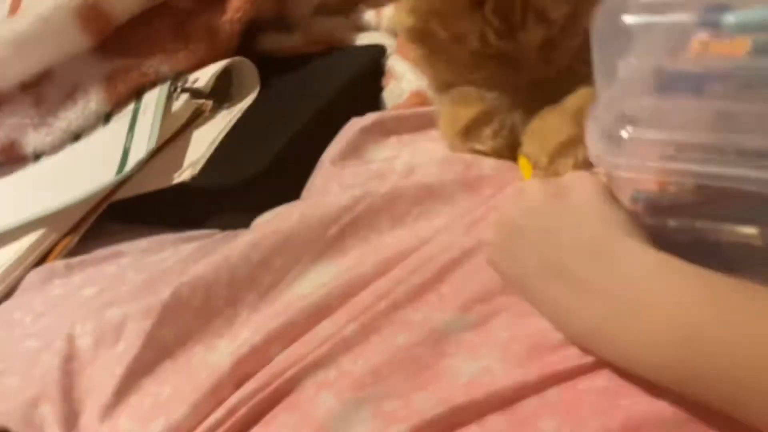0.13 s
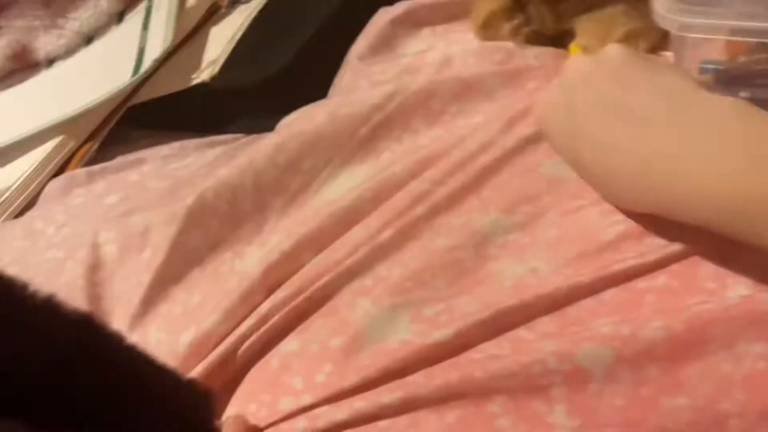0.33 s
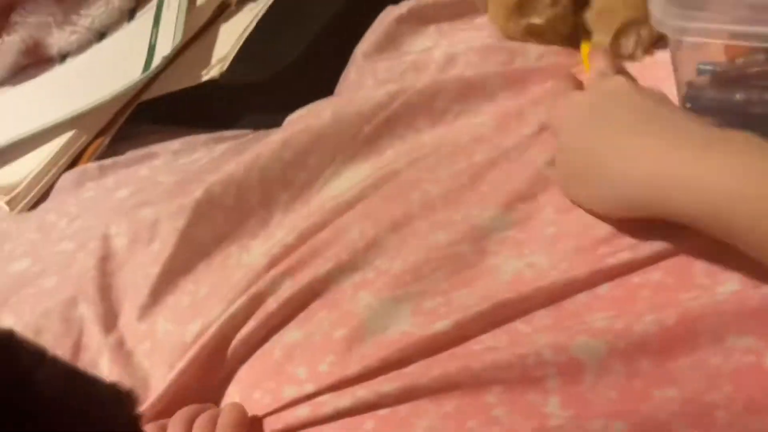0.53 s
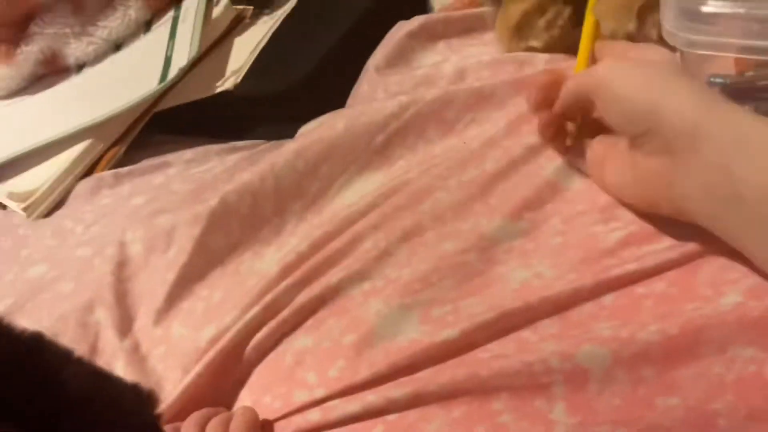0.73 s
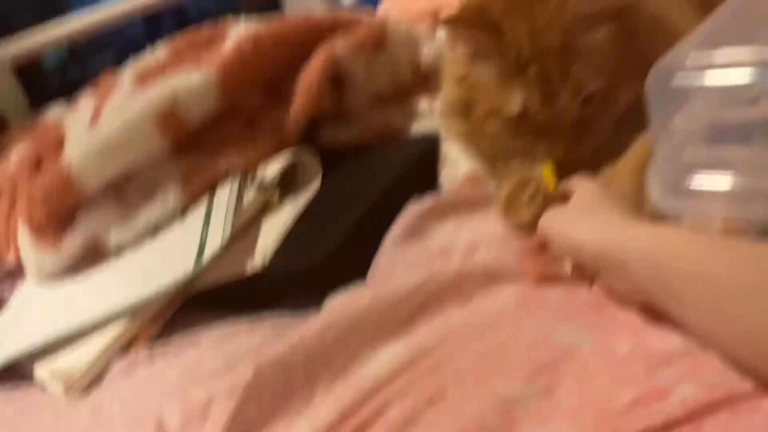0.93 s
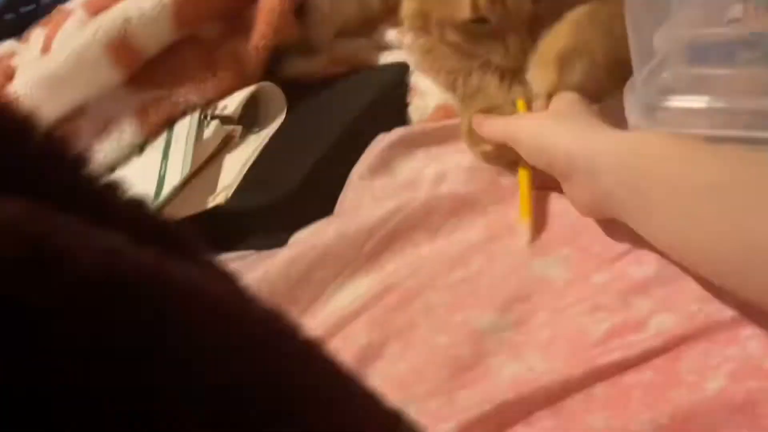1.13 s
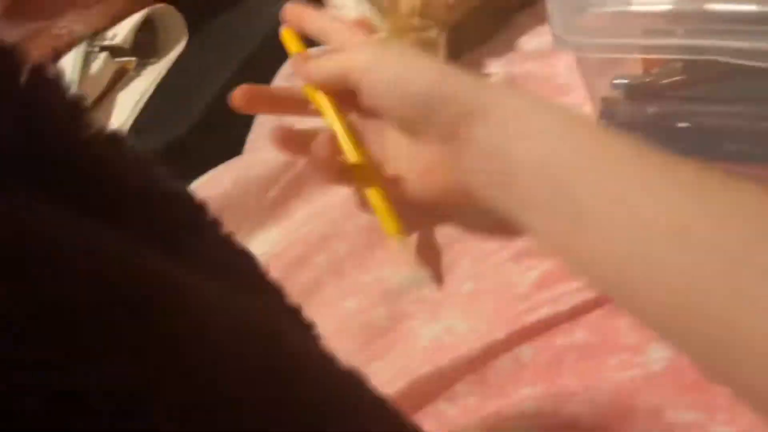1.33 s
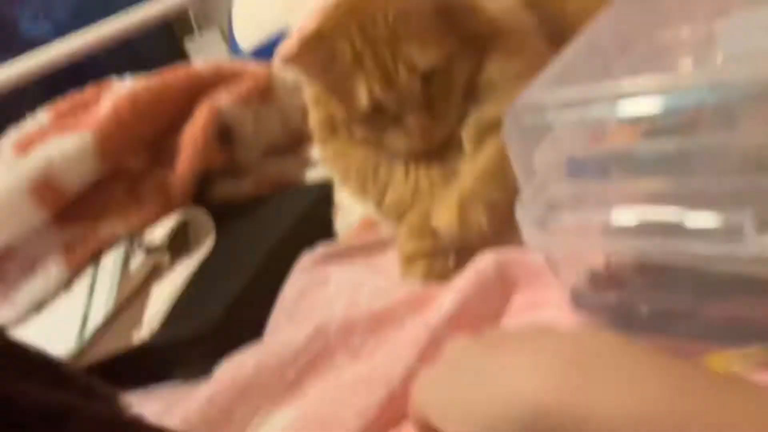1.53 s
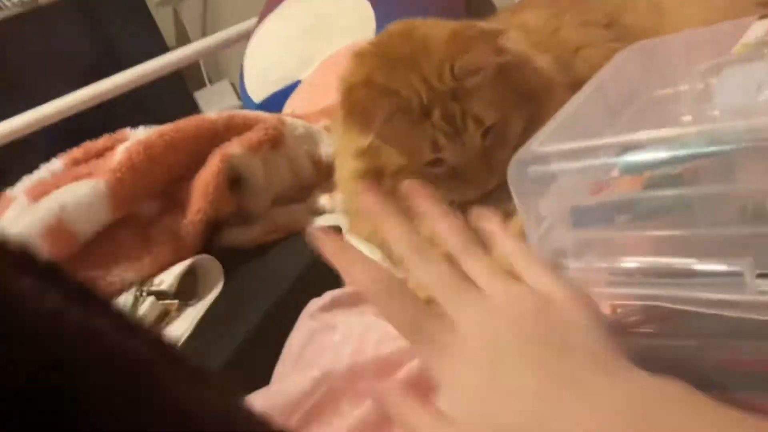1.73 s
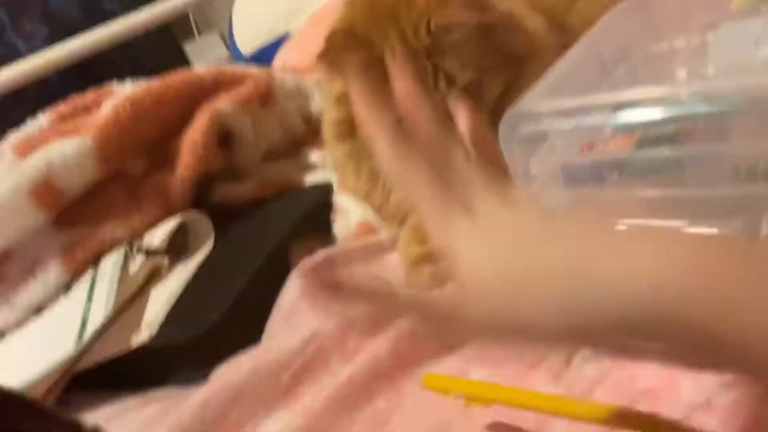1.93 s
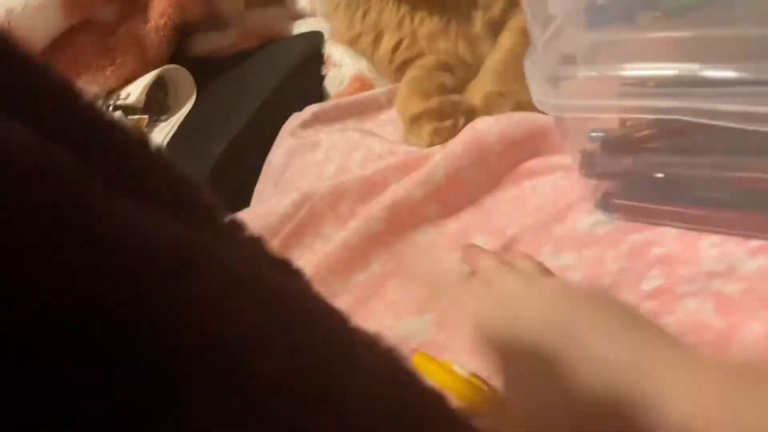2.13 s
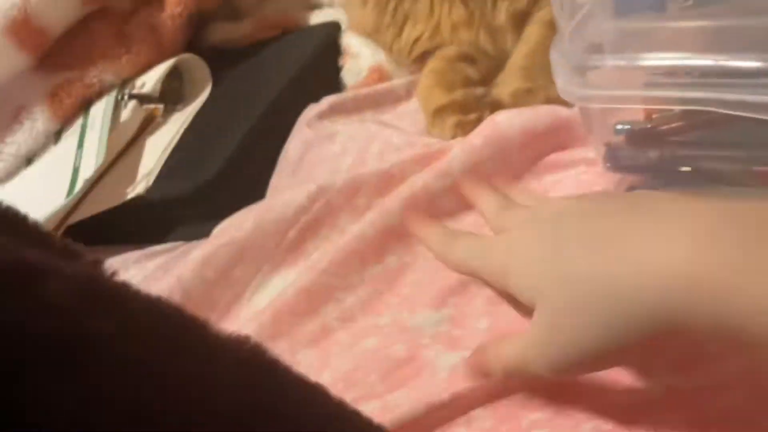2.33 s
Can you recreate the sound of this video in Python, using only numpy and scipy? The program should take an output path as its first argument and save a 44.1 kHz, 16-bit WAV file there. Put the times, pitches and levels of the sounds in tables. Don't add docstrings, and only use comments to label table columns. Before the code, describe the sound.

Two quick cat chirps, the first arching and falling, the second rising then dropping loudly, among hollow pats, dry ticks, cloth strokes and faint sniffs; close microphone, soft dry room, faint low hum.

```python
import sys
import numpy as np
from scipy import signal
from scipy.io import wavfile
from scipy.ndimage import uniform_filter1d

SR = 44100
rng = np.random.default_rng(int(sys.argv[2]) if len(sys.argv) > 2 else 0)


def put_to_file(sound):
    columns = np.atleast_2d(sound).T
    safe = np.clip(columns, -1, 1)
    whole_steps = np.round(safe * 32767)
    wavfile.write(sys.argv[1], SR, whole_steps.astype(np.int16))


def volts(x):
    e = np.asarray(x, float) / 20
    return 10 ** e


N = 109941

# time_s, pitch_hz, level_db
WHISTLES = [
    [(.566, 1400, -62), (.577, 1520, -47), (.586, 1740, -37), (.593, 1700, -30), (.601, 1625, -26.5),
     (.608, 1520, -30), (.6105, 1470, -38), (.614, 1390, -31), (.622, 1230, -39)],
    [(.619, 1300, -50), (.6245, 1330, -37), (.629, 1060, -50), (.636, 1030, -42), (.646, 1000, -46),
     (.668, 960, -64)],
    [(1.678, 1060, -56), (1.682, 1080, -46), (1.685, 1020, -36), (1.693, 1090, -28.5), (1.7015, 1170, -35),
     (1.7038, 1250, -31.5), (1.707, 1240, -47), (1.717, 1320, -50), (1.73, 1300, -62)],
    [(1.745, 1480, -48), (1.7535, 1495, -23.5), (1.760, 1485, -22), (1.7645, 1465, -24),
     (1.7695, 1410, -22), (1.7728, 1350, -33), (1.777, 1290, -23.5), (1.7805, 1230, -41),
     (1.805, 1190, -58)],
]
# multiple, level_db under the fundamental, before each note's own voice
OVERTONES = [(2, -16), (3, -37), (4, -33), (5, -36), (6, -39), (7, -30)]
# second_partial_db, higher_partials_db, loss_db per dB below the peak, loss_db per % of pitch sag
NOTE_VOICES = [(-8, 0, -.3, .3), (-10, -6, 0, 0), (-22, -5, -.2, 1), (2, -5, .7, 1.0)]


def chirps():
    out = 0
    flutter_db, jitter = 0.5 * drift(130), 0.006 * drift(240)
    rasp = [volts(6 * drift(100)) for _ in OVERTONES[1:]]
    for rows, (second_db, higher_db, loss, sag) in zip(WHISTLES, NOTE_VOICES):
        gate, hz, db = curve(rows)
        smooth_hz = uniform_filter1d(hz, size=150)
        phase = 2 * np.pi * np.cumsum(smooth_hz * (1 + jitter)) / SR
        db = uniform_filter1d(db, size=140)
        octave = volts(OVERTONES[0][1] + second_db) * np.cos(2 * phase)
        higher = sum(r * volts(d) * np.cos(k * phase) for r, (k, d) in zip(rasp, OVERTONES[1:]))
        upper = octave + volts(higher_db) * higher
        sag_percent = 100 * (hz / hz[db.argmax()] - 1)
        upper_db = loss * (db - db.max()) + np.minimum(sag * sag_percent, 9)
        level = np.sqrt(2) * volts(db + flutter_db)
        out = out + gate * level * (np.cos(phase) + upper * volts(upper_db))
    return out


# time_s, level_db, share of the second colour (0-1)
HISSES = [
    [(.543, -80.5, 0), (.562, -40.5, .01), (.578, -39, 0), (.606, -39.5, 0), (.636, -39, 0.9),
     (.678, -32, 1), (.700, -38.5, 0.97), (.735, -78, 0.7)],
    [(1.699, -56, 0.3), (1.712, -41.5, 0), (1.720, -41.5, 0.16), (1.728, -40, 0.02), (1.740, -41.5, 0.02),
     (1.748, -58, 0.3), (1.764, -57.5, 0.4), (1.795, -75, 0.6)],
]
# centre_hz, width_hz, level_db
NARROW_MOUTH = [(3200, 1000, -15), (6500, 450, -1), (8900, 1000, 1), (11800, 1600, -7), (14800, 1000, 2)]
OPEN_MOUTH = [(5000, 1000, -16), (6500, 600, -9), (8300, 800, 0), (10900, 2000, 0), (13800, 2400, -2)]
SECOND_CALL_MOUTH = [(3000, 900, -10), (4200, 450, -2), (6300, 700, -8), (8400, 900, -8), (10500, 600, 1),
                     (11700, 900, -3), (14200, 1800, 0)]
NOSE = [(2500, 2000, -13), (5400, 1000, -1), (9100, 1200, -5), (13300, 1800, -2), (15200, 1000, -4)]


def hiss():
    out = 0
    colours = [(NARROW_MOUTH, OPEN_MOUTH), (SECOND_CALL_MOUTH, NOSE)]
    for rows, (first, second) in zip(HISSES, colours):
        gate, db, share = curve(rows)
        share = np.clip(share, 0, 1)
        air = np.sqrt(1 - share) * tract(first) + np.sqrt(share) * tract(second)
        out = out + gate * volts(db) * air
    return out


# start_s, length_s, level_db, upper_resonances_db
SNIFFS = [
    (1.221, 0.078, -61, -2.5),
    (1.31, 0.04, -63, 2.5),
    (1.364, 0.053, -66.5, -2.5),
    (1.449, 0.05, -73, 0),
    (1.499, 0.068, -54, 9),
    (2.017, 0.018, -65.5, 0.5),
]


def sniffs():
    low, high = tract(NOSE[:2]), tract(NOSE[2:])
    return sum(volts(db) * swell(s, d) * (low + volts(upper_db) * high) for s, d, db, upper_db in SNIFFS)


# peak_s, peak_db, pitch_hz
PATS = [(.154, -58, 596, 2.5), (.159, -60, 646, 1.8), (.230, -53, 1300, 2.5), (.257, -51, 490, 3.4),
        (0.2842, -41, 1060, 3.3), (0.2968, -41.5, 2000, 3.4), (0.2977, -34.5, 730, 3.1),
        (0.3049, -41, 1230, 2.77), (0.3121, -43, 1100, 1.6), (.4077, -43, 920, 1.76),
        (.5290, -20, 1220, 5.55), (.5325, -27, 650, 2.38), (.533, -36.5, 2000, 4), (.5375, -26, 648, 4.13),
        (.5405, -36, 810, 1.4), (.536, -41, 330, 3.04), (.547, -42, 800, 2.8), (.563, -39.5, 880, 4.5),
        (.572, -41, 805, 3.6), (.734, -47, 660, 3.7), (.793, -47.5, 650, 2.2), (.862, -51, 900, 3.4),
        (.9848, -28, 1020, 5.4), (0.9907, -31.5, 700, 1.82), (0.9926, -42, 690, 2.78),
        (.991, -43, 330, 2.56), (1.0, -49, 1600, 5.7), (1.04, -56, 400, 3.3), (1.003, -46, 950, 3.8),
        (1.0192, -46.5, 1180, 2.6), (1.159, -45.5, 746, 2.04), (1.224, -45, 880, 3.9),
        (1.245, -45, 730, 1.53), (1.5095, -43, 1700, 4.6), (1.511, -40, 304, 1.78),
        (1.592, -38, 1300, 4.05), (1.5965, -32.5, 560, 2.1), (1.6005, -41, 600, 2), (1.604, -40, 520, 2.08),
        (1.8366, -37, 448, 1.65), (1.893, -47, 910, 8.4), (1.963, -42, 1200, 5.5), (1.969, -39, 1145, 4.13),
        (1.6813, -31.5, 1050, 4.1), (1.706, -46, 420, 2.14), (1.749, -48.5, 197, 2.3),
        (1.9701, -37, 315, 2.13), (1.975, -36.5, 200, 2.27), (2.4034, -48.5, 625, 3.5),
        (2.409, -42, 250, 2.06)]


def pats():
    rise_share, fall_octaves = 0.35, 1.1
    out, t = np.zeros(N), np.arange(N) / SR
    for s, db, hz, cycles in PATS:
        length = cycles / hz
        u = np.interp(t, [s - rise_share * length, s, s + (1.2 - rise_share) * length], [0, .5, 1])
        pitch = hz * 2 ** np.clip(-fall_octaves * (t - s) / length, -3, 3)
        phase = 2 * np.pi * np.cumsum(pitch * (u > 0)) / SR
        out += volts(db) * np.sin(np.pi * u) ** 2 * np.cos(phase)
    bed_cut_hz = 2400
    bed = tail(.05, np.exp(-2 * np.pi * bed_cut_hz / SR), 0.0026)
    return out + volts(-21) * signal.fftconvolve(out, bed)[:N]


# start_s, peak_db, pitch_hz, ring_cycles
TICKS = [(.188, -49, 4440, 12), (0.2, -47, 3000, 8), (0.2033, -45, 8500, 17), (.272, -48, 4000, 25),
         (.529, -40.5, 3400, 73), (0.572, -38, 4500, 10), (.757, -47, 7960, 17), (1.0258, -55, 3700, 17),
         (1.158, -60, 3600, 17), (1.183, -60, 4700, 64), (1.225, -52, 3500, 12), (1.593, -39.5, 3000, 12),
         (1.701, -39.5, 4200, 12), (1.716, -41, 4200, 30), (1.833, -52.5, 3480, 17),
         (1.9661, -31.5, 3600, 5.9), (1.9732, -47, 3200, 15), (2.469, -63.5, 2500, 12),
         (2.484, -49.5, 7700, 17)]


def claw_ticks():
    out = np.zeros(N)
    for s, db, hz, cycles in TICKS:
        modes = ring(s, hz, cycles) + 0.31 * ring(s, 0.53 * hz, cycles) + 0.45 * ring(s, 0.65 * hz, cycles)
        out += volts(db) * modes
    return out


def squeak():
    return volts(-77) * swell(0.135, 0.045) * np.sin(2 * np.pi * 3356 * np.arange(N) / SR)


# start_s, length_s, level_db, tilt_db_per_octave
STROKES = [(0.187, 0.16, -52, -3.5), (0.449, 0.16, -54, -3), (0.518, 0.23, -49.5, -4),
           (0.744, 0.032, -62, -7), (0.846, 0.1, -57, -5), (0.982, 0.019, -50, -10.5),
           (0.994, 0.079, -54.5, -6.5), (1.057, 0.12, -66.5, -6.5), (1.189, 0.2, -60.5, -5.5),
           (1.475, 0.26, -51.5, -4), (1.705, 0.06, -44.5, -1.5), (1.825, 0.19, -58, -3.5),
           (1.954, 0.042, -53, -7.5), (1.972, 0.2, -61.5, -5.5), (2.114, 0.29, -59.5, -4.5),
           (2.472, 0.073, -59.5, -2.5)]


def blanket():
    fibres_per_s, spread_db, low_hz = 6000, 3.5, 450
    hits = rng.random((2, N)) < fibres_per_s / SR
    strength = volts(spread_db * np.minimum(rng.exponential(1, (2, N)), 3))
    fibres = rms_one(hits * strength * rng.standard_normal((2, N)))
    shapes = np.array([volts(db) * swell(s, d) for s, d, db, _ in STROKES])
    tilt = np.array(STROKES)[:, 3]
    out = 0
    for hz, band in bands(fibres, 1.2):
        tilt_gain = volts(tilt * np.log2(max(hz, low_hz) / 3000))
        out = out + band * (tilt_gain * min(hz / low_hz, 1) @ shapes)
    return out


# start_s, length_s, level_db, from_hz, to_hz
SCRATCHES = [
    (1.075, 0.051, -57.5, 1100, 3545),
    (1.15, .06, -73, 3600, 3000),
    (0.87, 0.039, -66, 2100, 2500),
    (.80, 0.054, -70.5, 2500, 4400),
    (1.365, .035, -64, 2500, 4600),
]


def scratches():
    t, rough = np.arange(N) / SR, drift(880)
    out = 0
    for s, d, db, from_hz, to_hz in SCRATCHES:
        phase = 2 * np.pi * np.cumsum(np.interp(t, [s, s + d], [from_hz, to_hz])) / SR
        out = out + volts(db) * swell(s, d) * rough * np.sin(phase)
    return out


# time_s, level_db
SHUFFLE = [(0, -71), (.18, -80), (.4, -68), (1.45, -65), (1.6, -66), (1.95, -61.5), (2.49, -69.5)]


def bedding():
    lowpass = signal.butter(2, 960, fs=SR, output="sos")
    rub = rms_one(signal.sosfilt(lowpass, rng.standard_normal(N)))
    return volts(-1 + curve(SHUFFLE)[1] + 1.6 * drift(40)) * rub


def hum():
    phase = 2 * np.pi * np.cumsum(323 + 1 * drift(2.75)) / SR
    return np.sqrt(2) * volts(-64 + 1.3 * drift(3.3)) * np.sin(phase)


# frequency_hz, level_db per Hz
ROOM_AIR = [(71, -85.5), (120, 12.5), (343, 4.5), (387, 3), (465, -46), (961, -14), (1910, -20),
            (13800, -25), (15000, -32.5)]


def room_air():
    hz_points, db_points = np.transpose(ROOM_AIR)
    air = 0
    for hz, band in bands(rng.standard_normal((2, N)), 0.29):
        air = air + band * volts(np.interp(np.log(hz), np.log(hz_points), db_points))
    return volts(-70) * rms_one(air)


def bedroom(x):
    return signal.fftconvolve(x, tail(.14, .9, 0.0009))[:N]


def tail(t60, pole, gap):
    t = np.arange(SR // 2) / SR
    noise = signal.lfilter([1], [1, -np.clip(pole, 0, .99)], rng.standard_normal(len(t)))
    h = noise * volts(-60 * t / t60) * (t > gap)
    return h / np.sqrt(np.sum(h ** 2))


def rms_one(x):
    return x / np.sqrt(np.mean(x ** 2) + 1e-20)


def drift(rate):
    r = np.exp(-2 * np.pi * rate / SR)
    return rms_one(signal.lfilter([1], [1, -2 * r, r * r], rng.standard_normal(N + SR))[SR:])


def resonate(x, hz, width_hz):
    r = np.exp(-np.pi * width_hz / SR)
    gain = (1 - r * r) / 2
    return signal.lfilter([gain, 0, -gain], [1, -2 * r * np.cos(2 * np.pi * hz / SR), r * r], x)


def tract(peaks):
    air, out = rng.standard_normal(N), 0
    for k, (hz, width, db) in enumerate(peaks):
        doubled = resonate(resonate(air, hz, width), hz, 2 * width)
        out = out + (-1) ** k * volts(db + 2 * drift(34)) * doubled
    return rms_one(out)


def swell(start, length):
    u = np.interp(np.arange(N) / SR, [start, start + 0.36 * length, start + 1.058 * length], [0, .5, 1])
    return np.sin(np.pi * u) ** np.where(u < .5, 1, 1.8)


def curve(rows):
    s, *columns = np.transpose(rows)
    t, fade_s = np.arange(N) / SR, .003
    gate = np.clip(np.minimum(t - s[0], s[-1] - t) / fade_s, 0, 1)
    return [gate] + [np.interp(t, s, c) for c in columns]


def bands(source, patch_db):
    edges = np.append(90 * 2 ** np.arange(0, 7.5, .5), [14500, 19000])
    out = []
    for k, (a, b) in enumerate(zip(edges, edges[1:])):
        band = signal.sosfilt(signal.butter(2, [a, b], "band", fs=SR, output="sos"), source[k % 2])
        out.append((np.sqrt(a * b), volts(patch_db * drift(45)) * band))
    return out


def ring(s, hz, cycles):
    turns = hz * np.maximum(np.arange(N) / SR - s, 0)
    return np.sin(2 * np.pi * turns) * volts(-60 * turns / cycles) * (1 - np.exp(-turns / 0.1))


def scene():
    near = chirps() + pats() + claw_ticks() + squeak()
    breath = hiss() + sniffs()
    cloth = blanket() + scratches() + bedding()
    return (near + volts(-31) * bedroom(near) + breath + cloth + hum() + room_air())[None]


def band_limit(x):
    return signal.sosfilt(signal.butter(12, 16180, fs=SR, output="sos"), x)


def record(dry):
    x = signal.sosfilt(signal.butter(6, 136, "high", fs=SR, output="sos"), dry)
    x = signal.sosfilt(signal.cheby2(12, 70, 16650, fs=SR, output="sos"), x)
    return band_limit(x)


dry = scene()
out = record(dry)
put_to_file(out)
```